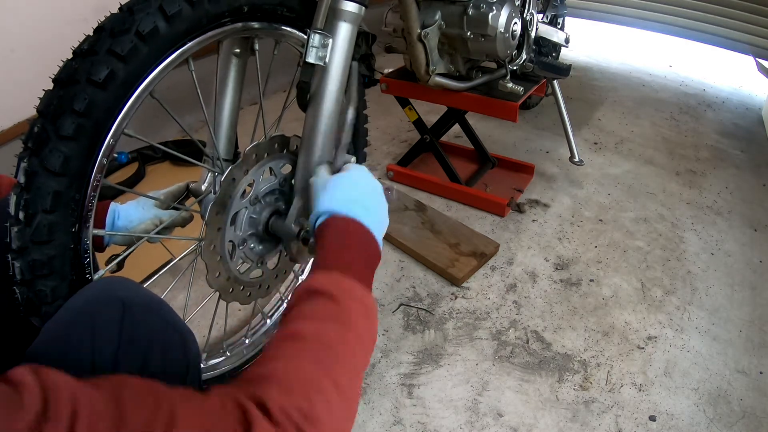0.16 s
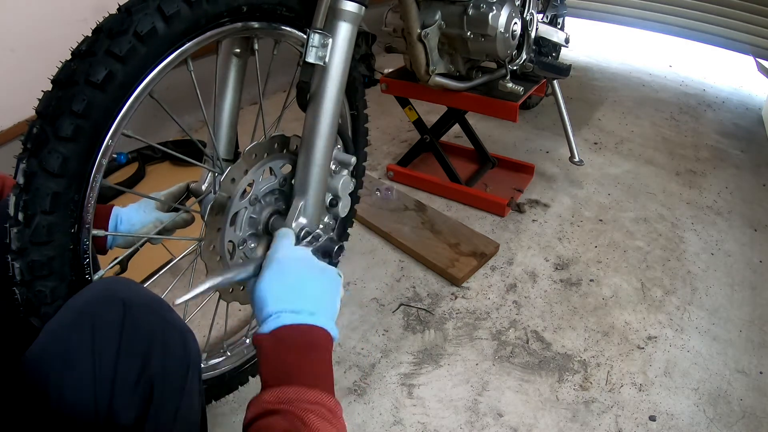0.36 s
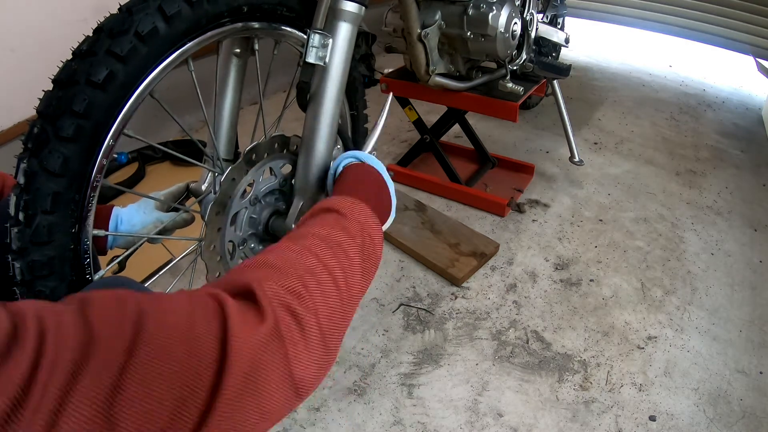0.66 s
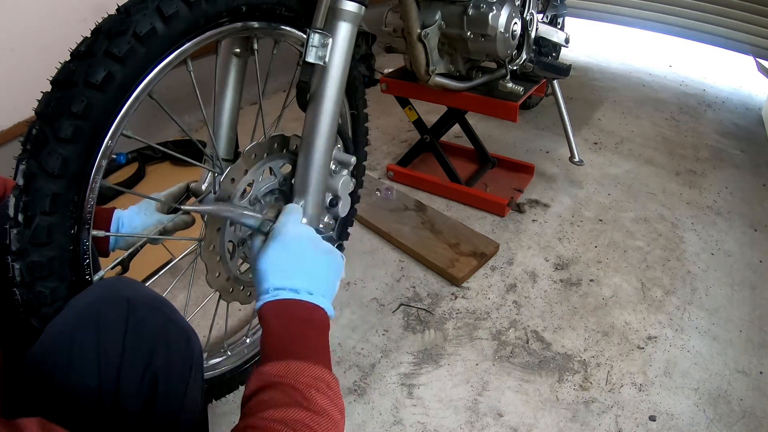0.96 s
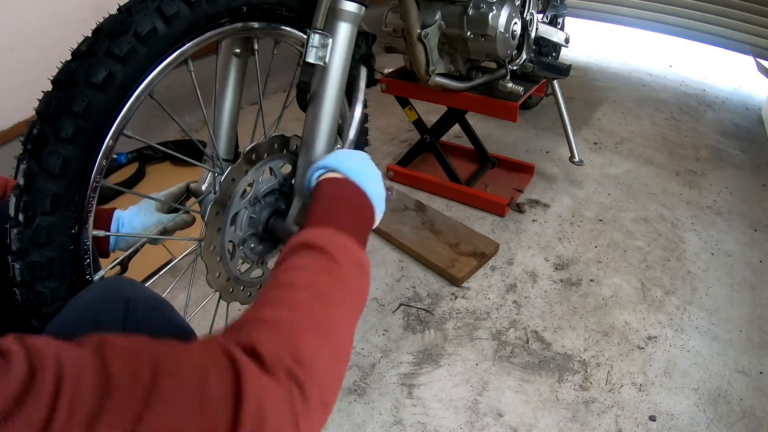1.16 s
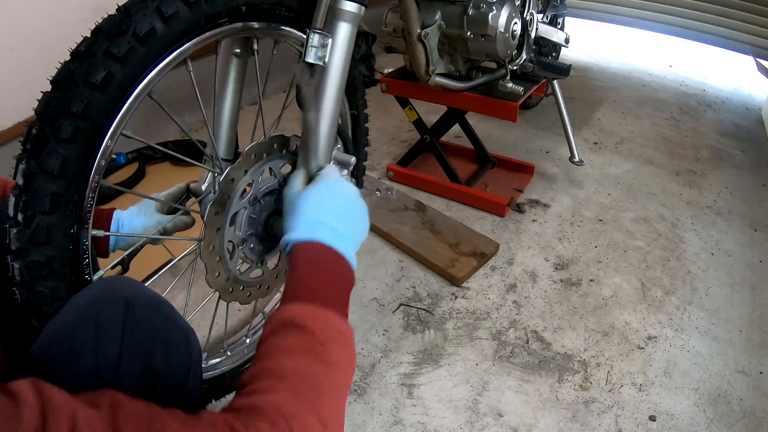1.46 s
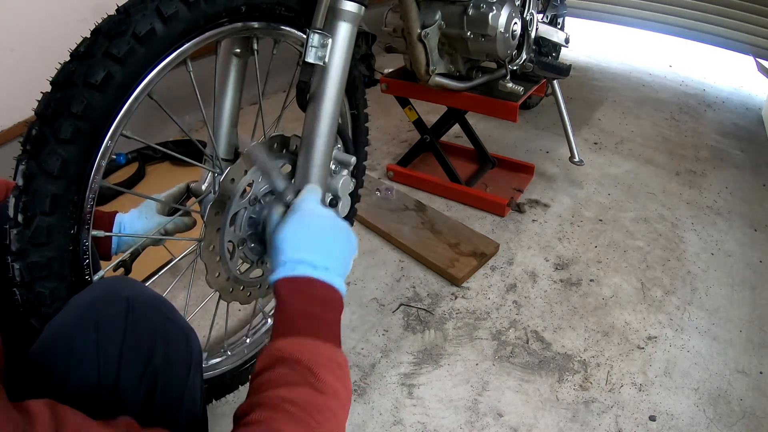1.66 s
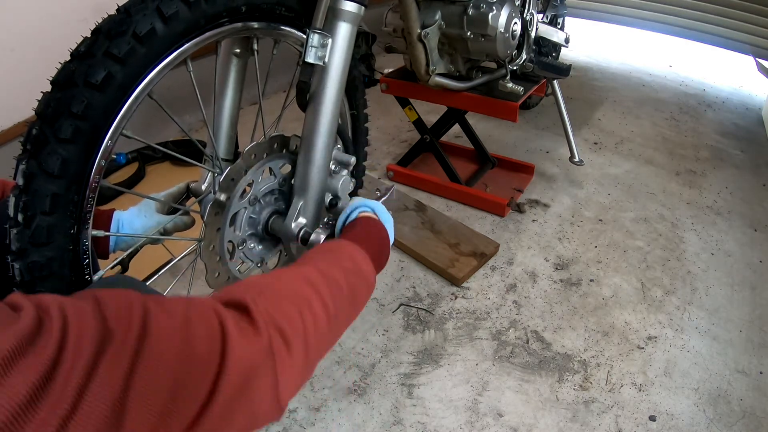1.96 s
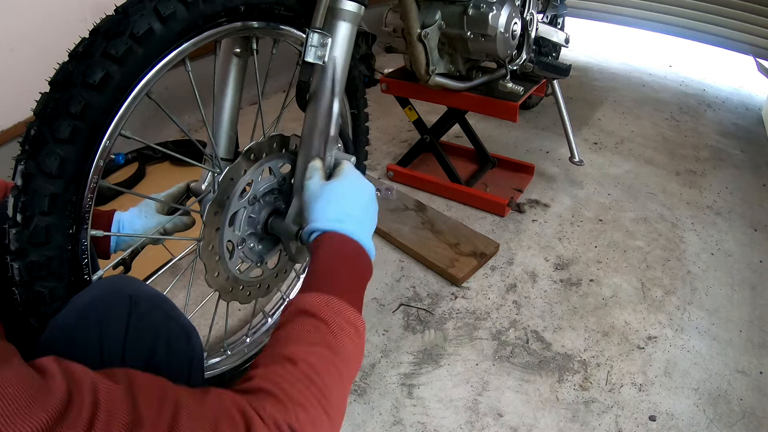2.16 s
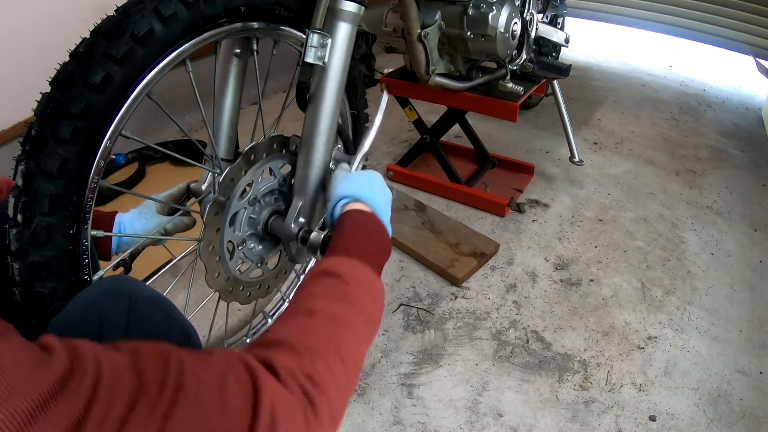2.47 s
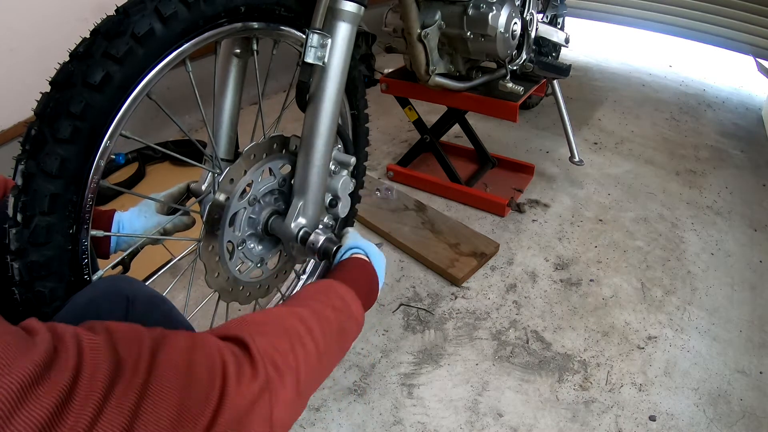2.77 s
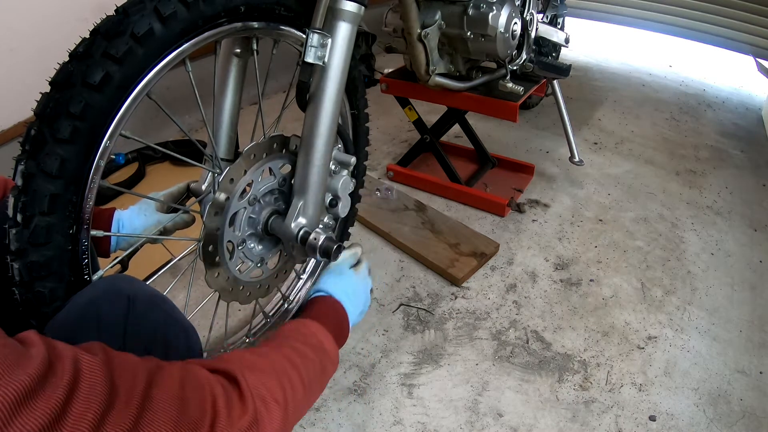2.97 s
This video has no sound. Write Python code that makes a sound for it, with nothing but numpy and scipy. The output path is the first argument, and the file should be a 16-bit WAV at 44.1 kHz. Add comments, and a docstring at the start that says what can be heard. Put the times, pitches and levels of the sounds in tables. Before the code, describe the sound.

Close stereo ratchet clicking in a bare garage: light knocks, then four short bursts of bright clicks separated by pauses, a shrill metal chatter during the third, and a few loose knocks at the end.

```python
"""A ratchet wrench tightens a motorcycle's axle nut in a bare garage.
First come quiet air and sleeve rustle (shaped noise), then socket knocks and four runs of pawl clicks:
snaps of noise with ringing steel, all echoing in the hard room (noise that dies away).
After the first run a low hum (gliding sines) starts to swell and fade, and dull handle bumps join in.
On the third swing a loose steel part chatters (short sine bursts) and rings on; later knocks end it."""
import sys
import numpy as np
from scipy import signal
from scipy.fft import rfft, irfft, next_fast_len
from scipy.io import wavfile
from scipy.ndimage import uniform_filter1d

SR = 44100
rng = np.random.default_rng(int(sys.argv[2]) if len(sys.argv) > 2 else 0)


def wrap_up_sound(samples):
    """Save the sound to the file named by the first command line argument, as 16-bit audio."""
    columns = np.atleast_2d(samples).T
    # keep every value between -1 and 1, then stretch to whole-number steps
    tamed = np.clip(columns, -1, 1)
    steps = np.round(tamed * 32767).astype(np.int16)
    wavfile.write(sys.argv[1], SR, steps)


N = 136710  # length of the scene in samples


def undb(db):
    """Turn decibels into a gain."""
    return 10 ** (np.asarray(db) / 20)


def unit(x):
    """Scale to an average (rms) strength of 1."""
    return x / np.sqrt(np.mean(x ** 2))


def along(points, hz):
    """Read a curve of (f/Hz, value) points on a log-frequency axis."""
    f, value = np.array(points, float).T
    return np.interp(np.log(hz + 1), np.log(f), value)


def colour(x, points):
    """Filter by a (f/Hz, level/dB) curve; minimum phase, so nothing sounds before its cause."""
    size = next_fast_len(2 * x.shape[-1], real=True) // 2 * 2
    gain = undb(along(points, np.fft.rfftfreq(size, 1 / SR)))
    # folding the cepstrum forward in time gives the minimum phase
    cepstrum = irfft(np.log(gain))
    cepstrum[1:size // 2] *= 2
    cepstrum[size // 2 + 1:] = 0
    response = np.exp(rfft(cepstrum))
    return irfft(rfft(x, size) * response)[..., :x.shape[-1]]


def pair(count, share):
    """Left and right noise with a share of their power in common."""
    noise, share = rng.standard_normal((3, count)), np.clip(share, 0, 1)
    return np.sqrt(share) * noise[0] + np.sqrt(1 - share) * noise[1:]


def pan(db):
    """Left and right gains for a source louder on the right by db."""
    return undb(np.array([[-db], [db]]) / 2)


def walk(rate):
    """Smooth random wandering with rms 1, from a new random value rate times a second."""
    k = int(SR / rate)
    steps = np.repeat(rng.standard_normal(N // k + 1), k)
    return unit(uniform_filter1d(uniform_filter1d(steps, k), k)[:N])


def add(out, start, x):
    """Mix x into out from a start time in seconds."""
    i = max(int(start * SR), 0)
    out[..., i:i + x.shape[-1]] += x[..., :max(N - i, 0)]


def ring(modes, t):
    """Metal rings as fading sines, each reaching the two microphones with its own phase."""
    total = 0
    for hz, db, t60 in modes:
        phase = 2 * np.pi * hz * t + rng.uniform(0, 2 * np.pi) + rng.normal(0, 0.36, (2, 1))
        total = total + undb(db - 60 * t / t60) * np.sin(phase)
    return total


def resonate(x, hz, width_hz, db):
    """Lift or dip one resonance."""
    b, a = signal.iirpeak(hz, hz / width_hz, fs=SR)
    return x + (undb(db) - 1) * signal.lfilter(b, a, x)


# how the sleeve's rustle rises and falls, before its random flutter: t/s, level/dB
RUSTLE_LEVEL = [(0, -51), (.15, -57.5), (.35, -46), (.7, -63.5), (0.819, -45), (1.15, -53.5), (1.42, -47.5),
                (1.6, -49), (1.76, -44), (1.96, -63), (2.15, -48), (2.5, -50), (2.8, -52), (3.1, -57.5)]
# tone of the rustling cloth, as relative level: f/Hz, level/dB
CLOTH_TONE = [(60, -24.5), (120, -4), (190, -1.5), (330, 2), (650, -7.5), (1200, -7), (2000, -15.5),
              (3500, -19.5), (6500, -24), (9000, -37.5), (16000, -55)]
# tone of the garage's quiet air, as relative level: f/Hz, level/dB
AIR_TONE = [(20, 2), (40, -7.5), (120, -5), (280, -4), (600, -20.5), (1800, -18.5), (3000, -27.5),
            (5000, -37), (6500, -30.5), (9000, -45), (16000, -54)]
AIR_DB, AIR_SHARE, FLUTTER_DB = -53.5, 0.39, 2  # AIR_SHARE: common to both sides, cloth too


def background():
    """Cloth rubbing is noise that follows the arm; the garage's air is steady noise under it."""
    level_db = np.interp(np.arange(N) / SR, *np.array(RUSTLE_LEVEL).T) + FLUTTER_DB * walk(34.75)
    sleeve = unit(colour(pair(N, AIR_SHARE), CLOTH_TONE)) * undb(level_db)
    air = unit(colour(pair(N, AIR_SHARE), AIR_TONE)) * undb(AIR_DB)
    return sleeve + air


# socket and handle take up their play; levels are relative:
# t/s, level/dB, body (1.5-4.5 kHz) level/dB, low ring level/dB, high ring level/dB,
# treble level/dB, time before the snap starts to fade t/s
KNOCK_TABLE = [(.1726, -10.5, -6, 4, -8, -17, 0.00093), (.1995, -18.5, 3, 7.8, -6, -9, 0.0024),
               (2.0235, -18.5, 5, 4.9, 0, -10, 0.0019), (2.436, -18.5, 5.5, 2, 7, -3, .002),
               (2.894, -17, -0.5, 14, 4, -6.5, 0.0016)]
# the pawl drops over a tooth: same columns as the knocks
CLICK_TABLE = [(0.2308, 4, -4, -7, 9.5, -3.5, 0.00065), (0.2575, -4.5, 2, 5, 1, 6, 0.0022),
               (0.2818, 1, 3.5, -11, -4, -1, 0.0015), (0.3062, 4, -0.5, 0, -1, -1, 0.0008),
               (0.3338, -5, 7.5, 9, -1, 3, 0.0017), (0.3618, 0.5, -2.5, 5, 6.5, -1, 0.00039),
               (0.3942, -4.5, -3, 0, 9.5, 3, 0.0025), (0.8482, 1, -3.5, 3.5, 13, -2.5, 0.0036),
               (0.8734, 2, -4.5, 4, 9, -2, 0.0012), (0.9005, 0.5, -1, 5, 3, -4, 0.0021),
               (0.9278, -4, 6, -7, 5, 5.5, 0.0028), (0.9548, 0, 0, 8.5, 1, -2, 0.0034),
               (1.0002, -1.5, -2.5, 4, 6.5, -2.5, 0.0011), (1.4572, -0.5, -1, 3, 2.5, -4.5, 0.0014),
               (1.4838, -0.5, 2.5, -4, 1, 0.5, 0.0042), (1.5085, 4.5, -8.5, -13, 10, -12, 0.00098),
               (1.5332, 1.5, 2, 10.5, 11.5, 0, 0.0006), (1.5597, -3.5, 9.5, 10, 2.5, 5.5, 0.00071),
               (1.589, 0, 2, 4.5, 2, 1, 0.00036), (1.6183, 3, -1.5, 6.5, 5.5, -6.5, 0.0019),
               (2.1184, 2.5, -3.5, 7, 13.5, -3.5, 0.0028), (2.1434, 4.5, -7, 0, 12, -1, 0.0013),
               (2.1655, -0.5, -4, -5, 0, -2, 0.00094), (2.1902, -1, 1, -2, 8, 4, 0.0019),
               (2.2172, -2.5, 2, -2, 4, -6, 0.0031), (2.262, -0.5, 0.5, 4, 2.5, 2, 0.0019),
               (2.2994, -2, 1.5, 10, -1, -2, 0.0021)]
# tone shared by clicks and knocks, as relative level: f/Hz, level/dB
CONTACT_TONE = [(100, -28), (350, -22.5), (470, -12), (600, -24.5), (850, -20), (1300, -14.5), (1830, -13),
                (2300, -13.5), (3100, -9), (5000, -8.5), (5600, -4.5), (6050, -2), (6450, -1), (7200, -3.5),
                (8400, -14), (9500, -9), (11600, -14), (12150, -20), (12550, -7.5), (13300, -22.5),
                (16000, -24)]
# ways the wrench and axle ring, before that tone: f/Hz, level/dB, time to fade by 60 dB t/s
STEEL_MODES = [(1800, -28, 0.083), (3595, -16.5, 0.037), (5120, -50, 0.034), (5550, -32, .12),
               (6100, -43, .15), (6340, -17.5, 0.077), (6600, -33, .1), (6590, -22, 0.079),
               (7084, -37, 0.27), (6990, -25, .2), (9700, -21, .02)]
SNAP_FALL = 0.92  # fade time constant, in snap lengths
BUZZ_S, BUZZ_DB, CONTACT_DB = 0.0077, -7, -1  # buzz fade time and level, level of every contact
LOW_RING_HZ, HIGH_RING_HZ, LOW_WIDTH_HZ, HIGH_WIDTH_HZ = 1890, 3630, 190, 310
TOOL_SHARE = 0.79  # share of the contact noise common to both microphones


def wrench(table):
    """Each steel contact snaps, buzzes briefly and rings; two main rings vary from hit to hit."""
    out, t = np.zeros((2, N)), np.arange(SR // 4) / SR
    for start, db, body_db, low_db, high_db, top_db, snap_s in table:
        snap = np.exp(-np.maximum(t / snap_s - 1, 0) / SNAP_FALL)
        buzz = undb(BUZZ_DB) * np.exp(-t / BUZZ_S)
        noise = pair(len(t), TOOL_SHARE) * (snap + buzz)
        hit = colour(noise + ring(STEEL_MODES, t), CONTACT_TONE)
        hit = hit / np.sqrt(np.sum(hit ** 2, axis=1, keepdims=True))  # same energy for every hit
        tone = [(600, body_db / 2), (1500, body_db), (4500, body_db), (5600, 0), (7500, 0), (9500, top_db)]
        hit = colour(hit, tone)
        hit = resonate(hit, LOW_RING_HZ, LOW_WIDTH_HZ, low_db)
        hit = resonate(hit, HIGH_RING_HZ, HIGH_WIDTH_HZ, high_db)
        add(out, start, hit * undb(db + CONTACT_DB))
    return out


# how long the garage echoes: f/Hz, time to fade by 60 dB t/s
ECHO_T60 = [(200, 0.37), (800, 1.28), (2000, 0.89), (4000, 0.75), (6500, 0.6826), (9000, 0.46),
            (12500, 0.3235), (15000, 0.4)]
# strength of the echo: f/Hz, level/dB
ECHO_TONE = [(200, 1.5), (500, 3.5), (1500, 3), (3600, -2), (6500, 1.5), (10000, 1.5), (15000, -1.5)]
# share of the echo's power common to both microphones: f/Hz, share (0-1)
ECHO_SHARE = [(300, 0.88), (550, 0.21), (1000, 0), (1500, 0.51), (2400, 0.42), (3500, 0.36), (8000, 0.09)]
ECHO_GAP_S, ECHO_BUILD_S = 0.0073, 0.0054  # silence before the echo, time constant of its rise
EARLY_DB, EARLY_S = -1, 0.084  # level and fade time of the early echoes


def garage(x):
    """Hard walls return spiky early echoes and a dense tail; each pitch range fades at its own pace."""
    t, hz = np.arange(SR) / SR, np.fft.rfftfreq(SR, 1 / SR)
    late = np.maximum(t - ECHO_GAP_S, 0)
    spikes = unit(rng.standard_normal((2, SR)) ** 3)  # cubing makes a few samples stand out
    early = spikes * undb(EARLY_DB) * np.exp(-late / EARLY_S)
    own = rfft(rng.standard_normal((2, SR)) + early)
    common = rfft(rng.standard_normal(SR))
    share = np.clip(along(ECHO_SHARE, hz), 0, 1)
    noise = np.sqrt(1 - share) * own + np.sqrt(share) * common
    centres = np.geomspace(150, 16000, 14)
    tail = 0
    for centre, weights in zip(centres, np.eye(len(centres))):
        band = irfft(noise * np.interp(hz, centres, weights))  # overlapping bands
        tail = tail + band * undb(-60 * t / along(ECHO_T60, centre))
    tail = tail * (1 - np.exp(-late / ECHO_BUILD_S))
    tail = colour(tail / np.sqrt(np.sum(tail ** 2) / 2), ECHO_TONE)
    return signal.fftconvolve(x[:1], tail, axes=1)[:, :N]  # the left signal feeds both sides


# swells of the low hum, before panning and wavering:
# t/s, length t/s, attack t/s, release t/s, first f/Hz, last f/Hz, level/dB
HUM_SWELLS = [(.62, 0.63, 0.18, 0.15, 65.8, 67.4, -27.5), (1.238, 0.11, 0.058, 0.056, 72, 76.4, -38.5),
              (1.53, .17, 0.087, 0.11, 75.6, 76.5, -43), (1.758, .14, 0.071, 0.076, 72, 68, -35.5),
              (2.138, .12, 0.047, 0.042, 73, 71, -45.5), (2.353, .14, .07, 0.034, 74, 77, -46),
              (2.491, 0.093, .03, 0.052, 84.5, 84, -40.5), (2.594, 0.32, 0.1, 0.09, 90.4, 100, -35),
              (2.58, 0.514, 0.062, 0.32, 62.1, 58, -46.5)]
WAVER, OVERTONE_DB, HUM_RIGHT_DB = 0.13, -23.5, 3  # WAVER: rms change of loudness


def hum():
    """A gliding low sine and its faint octave come in wavering swells."""
    out = np.zeros(N)
    for start, length, attack, release, first_hz, last_hz, db in HUM_SWELLS:
        t = np.arange(int(length * SR)) / SR
        phase = 2 * np.pi * np.cumsum(np.linspace(first_hz, last_hz, len(t))) / SR
        shape = np.minimum(np.minimum(t / attack, (length - t) / release), 1)
        tone = np.sin(phase) + undb(OVERTONE_DB) * np.sin(2 * phase)
        add(out, start, undb(db) * shape * tone)
    return out * (1 + WAVER * walk(120)) * pan(HUM_RIGHT_DB)


# dull bumps of the handle, level relative: t/s, level/dB, fade time constant t/s
BUMP_TABLE = [(.7622, -19.5, .005), (.796, -26.5, .012), (2.0235, -23.5, 0.0081)]
# tone of a bump, as relative level: f/Hz, level/dB
BUMP_TONE = [(100, -22), (500, -13), (850, 0.5), (1300, -0.5), (1900, -6), (2500, -13), (3400, -9.5),
             (4500, -22), (12000, -44)]


def bumps():
    """Soft, damped contacts are short fading noise without a ring."""
    out, t = np.zeros((2, N)), np.arange(SR // 8) / SR
    for start, db, decay in BUMP_TABLE:
        hit = colour(pair(len(t), TOOL_SHARE) * np.exp(-t / decay), BUMP_TONE)
        add(out, start, undb(db) * hit / np.sqrt(np.sum(hit ** 2) / 2))
    return out


# bursts of the loose part, before the left-right balance: t/s, length t/s, f/Hz, level/dB
CHATTER_BURSTS = [(1.522, 0.015, 3700, -22), (1.623, 0.0056, 3660, -21), (1.628, .012, 3805, -25),
                  (1.668, .013, 3706, -27)]
# what it rings with afterwards, before that balance: f/Hz, level/dB, time to fade by 60 dB t/s
LOOSE_MODES = [(3698, -44, 0.63), (3752, -44.5, 0.81), (3944, -42, 0.63), (3930, -40, .4)]


def loose_part():
    """Chatter is brief shrill sine bursts; the strongest leaves the part ringing."""
    out = np.zeros((2, N))
    for start, length, hz, db in CHATTER_BURSTS:
        t = np.arange(int(length * SR)) / SR
        shape = np.sqrt(np.sin(np.pi * t / length))
        add(out, start, undb(db) * shape * np.sin(2 * np.pi * hz * t))
    strongest_start = CHATTER_BURSTS[1][0]
    add(out, strongest_start, ring(LOOSE_MODES, np.arange(SR) / SR))
    return out


def sides(x, points):
    """Make x louder on the right by (f/Hz, level/dB) and let it reach the left microphone first."""
    lag_s = 3.3e-5
    hz = np.fft.rfftfreq(N, 1 / SR)
    gain = undb(along(points, hz) / 2)
    delay = np.exp(-2j * np.pi * hz * lag_s)
    return irfft(rfft(x) * np.array([1 / gain, gain * delay]), N)


# how much louder the right microphone hears the tool: f/Hz, level/dB
TOOL_BALANCE = [(500, 6), (1000, -3), (2000, 0), (3700, 0.5), (5500, 12.5), (7000, 1.5), (12000, 1.5)]
# the same for the room and background: f/Hz, level/dB
ROOM_BALANCE = [(250, 2), (500, 6.5), (1000, 3), (2000, 0.5), (3700, 0.5), (5500, 4.5), (7000, 2),
                (12000, -1.5)]


def scene():
    """Mix tool, loose part, echo, background and hum, each with its left-right balance."""
    tool = wrench(CLICK_TABLE) + wrench(KNOCK_TABLE) + bumps()
    loose = loose_part()
    echo = garage(tool + undb(-7) * loose)  # the chatter feeds the echo 7 dB weaker
    room = echo + background()
    return sides(tool + loose, TOOL_BALANCE) + sides(room, ROOM_BALANCE) + hum()


def record(dry):
    """A steep low-pass filter removes the treble above 15.7 kHz."""
    return signal.sosfilt(signal.ellip(8, .2, 70, 15700, fs=SR, output="sos"), dry)


dry = scene()
out = record(dry)
wrap_up_sound(out)
```